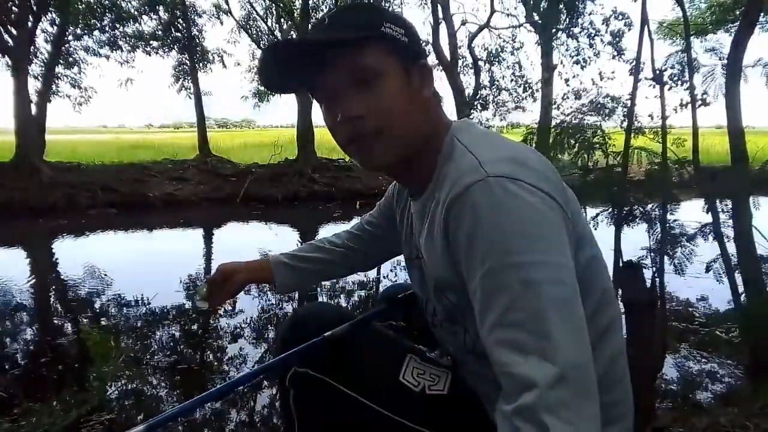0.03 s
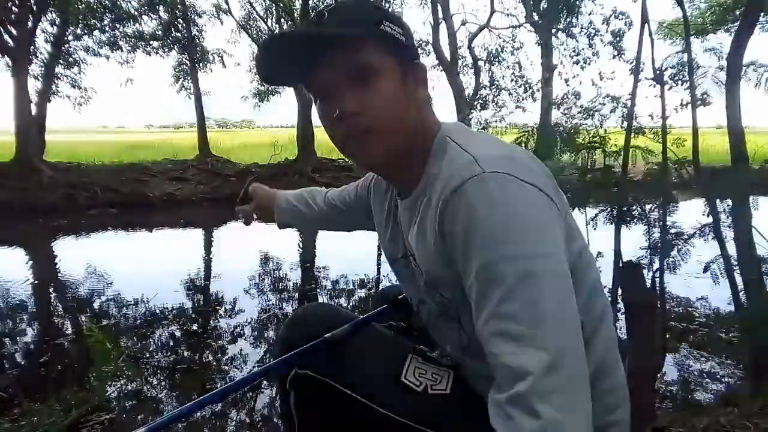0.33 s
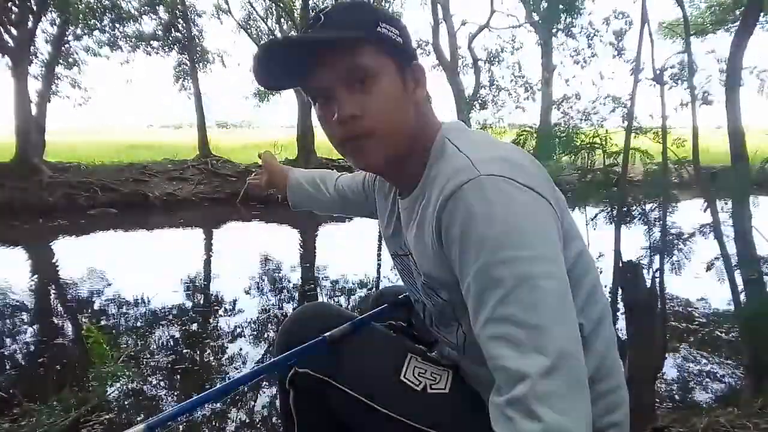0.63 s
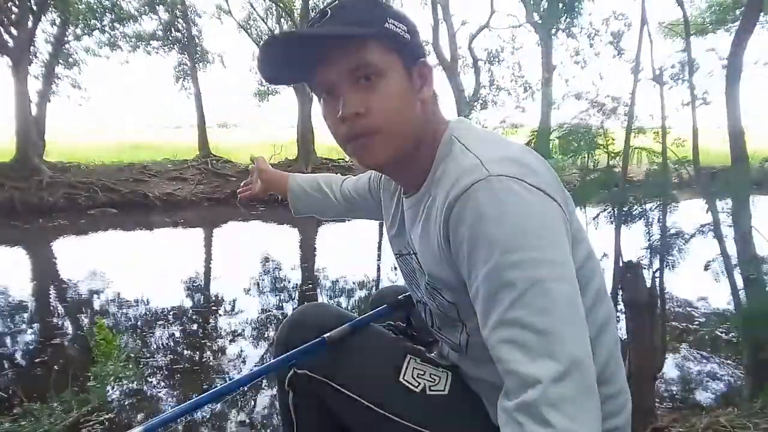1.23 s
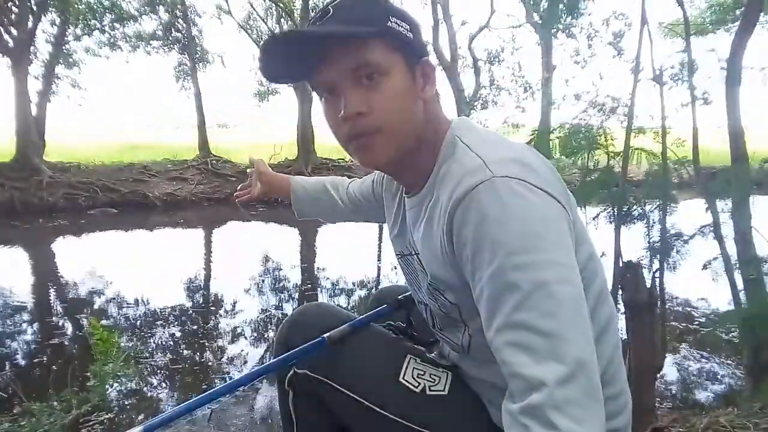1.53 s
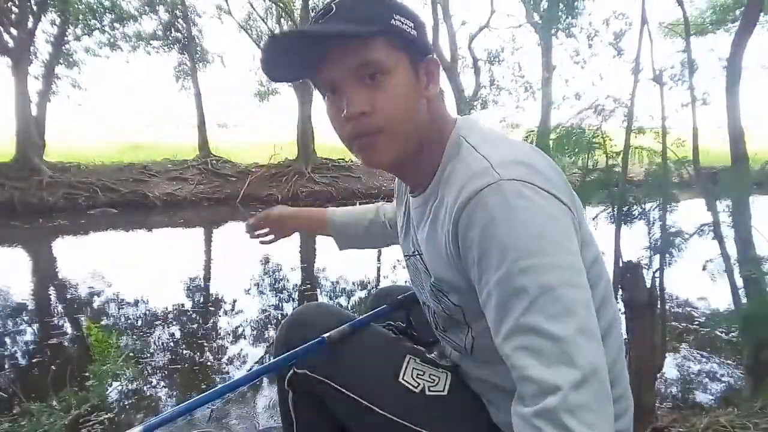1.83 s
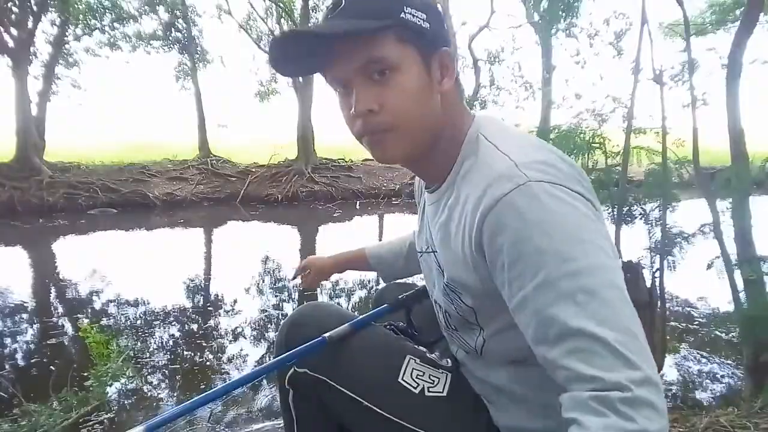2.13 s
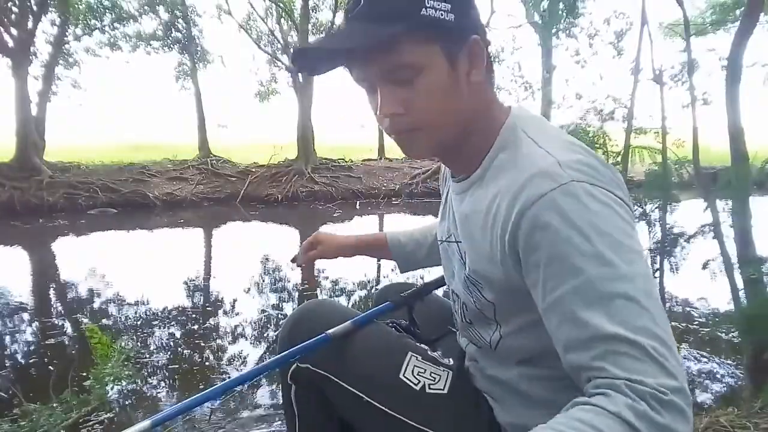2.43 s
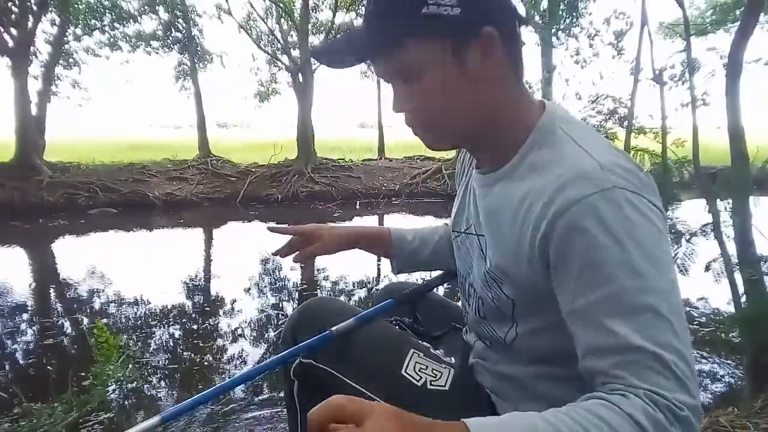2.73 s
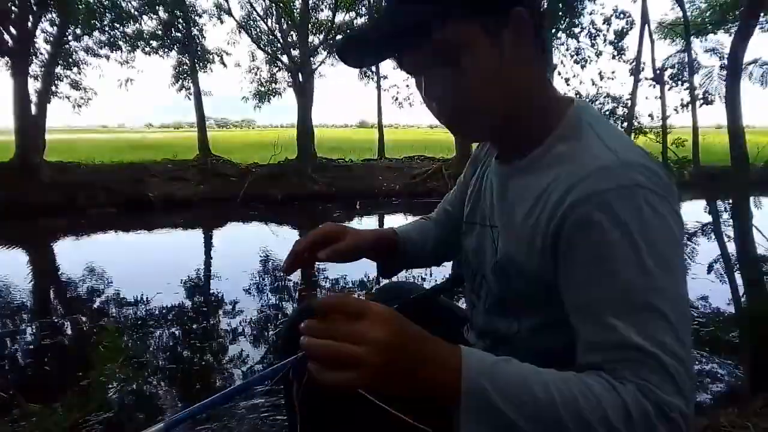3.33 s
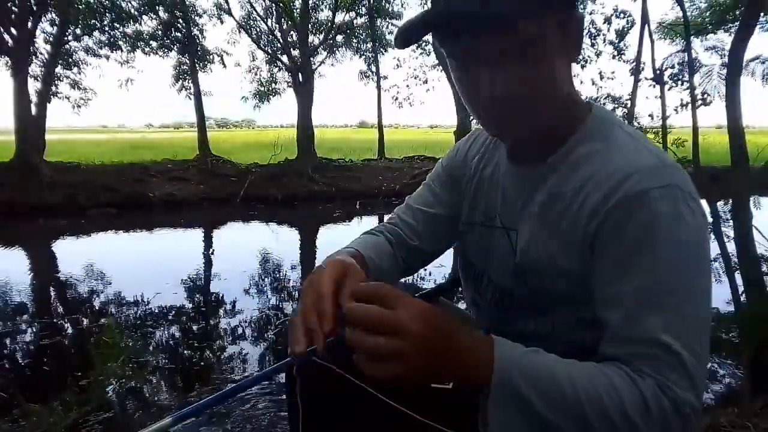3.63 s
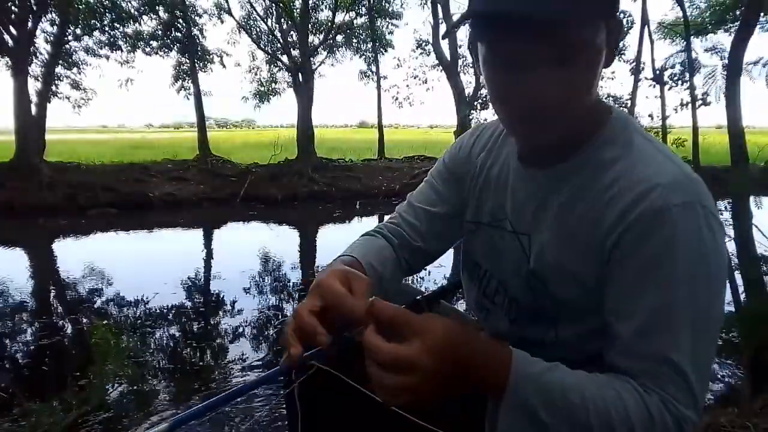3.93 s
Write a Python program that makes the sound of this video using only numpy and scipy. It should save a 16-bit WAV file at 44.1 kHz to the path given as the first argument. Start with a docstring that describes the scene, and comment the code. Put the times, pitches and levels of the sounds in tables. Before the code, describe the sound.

A small thing splashes into a still channel with a sharp slap, bubbles and pattering spray. Birds chirp in the trees over faint insects and thin ticks, while a hand bumps and rubs the microphone throughout.

```python
"""Beside a still channel under trees, with the microphone on a hand-held camera.
A small thing is tossed into the water: a sharp slap, ringing bubbles, then spray pattering back.
Birds chirp, whistle and slur from the trees, the farther ones mostly echo, and a small creature's
thin high ticks stand over a steady band of insects and distant air.
Right at the microphone, the hand bumps and rubs the case, and a sleeve rustles."""
import sys
import numpy as np
from scipy import signal
from scipy.fft import rfft, irfft
from scipy.io import wavfile

SR = 44100
rng = np.random.default_rng(int(sys.argv[2]) if len(sys.argv) > 2 else 0)


def unload_wav(signal):
    """Save mono or channel-first audio to the path in sys.argv[1] as 16-bit WAV at rate SR, clipped to [-1, 1]."""
    wavfile.write(
        sys.argv[1],
        SR,
        np.round(np.clip(np.atleast_2d(signal).T, -1, 1) * 32767).astype(np.int16),
    )


N = 176400
T = np.arange(N) / SR

# spectrum of water pattering on water (frequency [Hz], relative density [dB])
PATTER_SPECTRUM = [(200, -11), (600, -3), (1200, -8.5), (2100, 4), (3000, -7.5), (4500, -2), (7000, -2),
                   (9000, -8), (11500, -7.5), (16000, -18)]
DROP_CYCLES, SPRAY_SPREAD_DB = 6.5, 3  # cycles for a drop's ring to fall to 1/e; spread of drop levels


def amp(db):
    return 10 ** (np.asarray(db) / 20)


def unit(x):
    return x / np.sqrt(np.mean(x ** 2) + 1e-20)


def add(mix, s, sound):
    part = mix[max(round(s * SR), 0):][:len(sound)]
    part += sound[:len(part)]


def level(points):
    """Gain along a curve of (time [s], level [dB])."""
    return amp(np.interp(T, *np.transpose(points)))


def colour(x, points):
    """Filters by a spectrum of (frequency [Hz], level [dB]); rms 1."""
    f, db = np.transpose(points)
    hz = np.fft.rfftfreq(len(x), 1 / SR)
    gain = amp(np.interp(np.log(hz + 1), np.log(f), db))
    return unit(irfft(rfft(x) * gain, len(x)))


def wander(hz, size=N):
    """Smooth random motion up to a rate; rms 1."""
    f = np.fft.rfftfreq(size, 1 / SR)
    return unit(irfft(rfft(rng.standard_normal(N)[:size]) / (1 + (f / hz) ** 4), size))


def grains(per_s, spread_db):
    """Random clicks of uneven size; rms 1."""
    sizes = rng.standard_normal(N) * amp(spread_db * np.minimum(rng.exponential(1, N), 4))
    return unit(sizes * (rng.random(N) < per_s / SR))


def tone(hz):
    """A sine that follows a pitch curve."""
    return np.sin(2 * np.pi * np.cumsum(hz) / SR)


def trees(x, t60_s=0.38, build_s=0.0011):
    """Diffuse echo from trunks, leaves and banks."""
    t = T[:SR // 2]
    tail = rng.standard_normal(len(t)) * 1000 ** (-t / t60_s) * (1 - np.exp(-t / build_s))
    return signal.fftconvolve(x, tail / np.linalg.norm(tail))[:N]


def insects(centre_hz=7545, width_hz=270, db=-76, flutter_db=2):
    """Insects merge into one steady, narrow band that flutters slightly."""
    hz = np.fft.rfftfreq(N, 1 / SR)
    band = 1 / (1 + ((hz - centre_hz) / width_hz) ** 2 / 2) ** 1.36
    hiss = unit(irfft(rfft(rng.standard_normal(N)) * band, N))
    return hiss * amp(db + flutter_db * wander(hz=39.5))


def air(db=-70.5):
    """Distant air: a faint, even wash, strongest in the bass."""
    # spectrum of the open air (frequency [Hz], relative density [dB])
    spectrum = [(20, 18.5), (100, 16.5), (250, 10.5), (420, 4.5), (714, 3), (1200, 1.5), (3100, -2),
                (3700, -0.5), (4600, -3.5), (6700, -1.5), (9300, -7), (15000, -9)]
    return amp(db) * colour(rng.standard_normal(N), spectrum)


def handling(push_db=-0.5, push_cycles=0.21, shudder_db=-9, shudder_s=0.015, lumps_db=6):
    """At the microphone, each bump pushes the case and sets it shuddering; the grip rubs in between."""
    # bumps of the hand (time [s], level [dB], sharpness [Hz])
    bumps = [(.042, -16, 118), (0.282, -28.5, 115), (0.511, -29, 127), (.599, -22.5, 121),
             (.621, -24.5, 121), (.654, -21, 107), (.803, -28, 81), (0.842, -26, 101), (1.278, -26, 154),
             (1.308, -24, 117), (1.42, -28.5, 132), (1.435, -22, 273), (1.438, -15, 135), (1.448, -19, 192),
             (1.641, -26.5, 109), (1.659, -24, 151), (2.05, -22.5, 114), (2.182, -25, 93),
             (2.214, -22, 131), (2.373, -27, 111), (2.435, -27.5, 89.5), (2.466, -26.5, 130),
             (2.707, -24, 90), (2.925, -23.5, 114), (2.964, -27.5, 117), (3.019, -22.5, 115),
             (3.052, -26, 140), (3.098, -22.5, 122), (3.139, -19, 125), (3.202, -25, 130),
             (3.313, -23.5, 113), (3.389, -19.5, 140), (3.504, -28.5, 145), (3.626, -29.5, 111),
             (3.667, -26.5, 146), (3.869, -27, 106), (3.945, -27, 96)]
    # rubbing of the hand (time [s], level [dB])
    grip = [(0, -33), (.12, -50), (.4, -51), (.55, -39.5), (.85, -40.5), (.92, -55), (1.05, -32),
            (1.22, -72), (1.3, -38.5), (1.46, -30), (1.56, -42.5), (1.98, -48.5), (2.22, -33.5),
            (2.32, -47.5), (2.48, -33.5), (2.75, -56.5), (3.05, -30.5), (3.27, -41.5), (3.42, -35.5),
            (3.56, -41.5), (4, -43.5)]
    # rumble of the case (frequency [Hz], relative density [dB])
    case_spectrum = [(15, -28.5), (30, -15), (60, 4.5), (110, 2.5), (160, -8), (250, -25.5), (350, -32),
                     (500, -44.5), (900, -65), (2000, -93)]
    pushes, shudder_power = np.zeros(N), np.zeros(N)
    for s, db, hz in bumps:
        spread = ((T - s) * hz / push_cycles) ** 2 / 2
        pushes -= amp(db + push_db) * np.exp(-np.minimum(spread, 50)) * (1 - spread)
        shudder_power += amp(db + shudder_db) ** 2 * np.exp(-np.minimum(2 * abs(T - s) / shudder_s, 50))
    pushes = signal.sosfilt(signal.butter(2, 49.6, "high", fs=SR, output="sos"), pushes)
    rub = level(grip) * unit(amp(lumps_db * wander(hz=18.4)))
    return pushes + np.sqrt(shudder_power + rub ** 2) * colour(rng.standard_normal(N), case_spectrum)


def raspy_call(pitch, swell, db, rasp, under=0, under_ratio=0.72):
    """A bird's voice, rough with pitch jitter, as (direct, to the trees); fainter calls are farther off."""
    hz = pitch * (1 + rasp * wander(hz=750, size=len(pitch)))
    call = amp(db) * swell * (tone(hz) + under * tone(under_ratio * hz))
    direct_share = np.clip(0.37 * amp(db + 53), 0, 1)  # 37 % of the power for a call at -53 dB
    return np.sqrt(direct_share) * call, np.sqrt(1 - direct_share) * call


def chirps(break_at=0.52, break_width=0.087, step_share=0.444, dip=0.29, under_db=-8.5):
    """A bird sags on a high note, breaks, and sags on a low one; a second voice sounds below the first."""
    # falling chirps (time [s], length [s], level [dB], start [Hz], end [Hz], rasp [share of pitch])
    calls = [(0.014, 0.063, -61.5, 4580, 3020, 0.094), (0.292, 0.051, -54, 5260, 3550, 0.044),
             (0.844, .06, -64, 4580, 3550, 0.096), (1.07, 0.06, -52.5, 5240, 3210, 0.08),
             (1.645, 0.072, -62, 4390, 3020, 0.083), (1.973, 0.061, -50, 5320, 3550, 0.043),
             (2.718, 0.058, -52, 5325, 3480, 0.05), (3.252, 0.073, -60, 4500, 3000, 0.14),
             (3.356, 0.029, -57.5, 5630, 3470, 0.1), (3.656, 0.059, -51.5, 5360, 3400, 0.05)]
    near, far = np.zeros(N), np.zeros(N)
    for s, length, db, high, low, rasp in calls:
        u = np.arange(0, 1, 1 / (length * SR))
        step = (1 + np.tanh((u - break_at) / break_width)) / 2
        pitch = high + (low - high) * (step_share * step + (1 - step_share) * u)
        swell = np.sin(np.pi * u) ** 0.55 * (1 - dip * np.sin(np.pi * step))
        direct, scattered = raspy_call(pitch, swell, db, rasp, under=amp(under_db) * (1 - step))
        add(near, s, direct)
        add(far, s, scattered)
    return near + trees(far)


def sleeve():
    """Cloth brushes close to the microphone in short swells of fine grains."""
    # swells of rustling (time [s], rise [s], fall [s], level [dB])
    rustles = [(.09, .04, 0.032, -72.5), (2.461, 0.032, 0.14, -67.5), (2.78, 0.044, 0.027, -71),
               (2.91, 0.0066, 0.049, -64), (3.128, 0.013, 0.033, -74), (3.802, 0.0049, 0.074, -61.5)]
    # spectrum of the cloth (frequency [Hz], relative density [dB])
    cloth = [(300, -14), (1500, -14.5), (4000, -3.5), (7000, -1), (11000, -5.5), (16000, -12)]
    swell = sum(amp(db) * np.exp(-np.maximum((s - T) / rise, (T - s) / fall))
                for s, rise, fall, db in rustles)
    return swell * colour(grains(per_s=6900, spread_db=1.0), cloth)


def ticks(length_s=0.0044, sag=0.33, echo=0.48):
    """A small creature's ticks: the pitch whips up and down within a few milliseconds."""
    # thin ticks (time [s], peak [dB], top pitch [Hz])
    calls = [(0.1193, -55, 7530), (0.547, -56, 7900), (1.6185, -42, 7790), (1.7515, -55.5, 7580),
             (1.9945, -52.5, 7820), (2.1266, -48, 7650), (2.578, -49.5, 7670), (2.647, -52.5, 7500),
             (2.7213, -47, 7950), (2.7847, -51, 7400), (2.9878, -47, 7810), (3.124, -45.5, 7860),
             (3.428, -44, 7840), (3.5684, -41.5, 7780), (3.96, -49.5, 7450), (3.988, -44, 7830)]
    out, u = np.zeros(N), np.arange(0, 1, 1 / (length_s * SR))
    arch = 1 - sag * abs(2 * u - 1) ** 2.98
    swell = np.sin(np.pi * u) ** 0.69
    for s, db, top in calls:
        add(out, s, amp(db) * swell * tone(top * arch))
    return out + echo * trees(out)


def whistles(arch=0.0185, waver=0.0078, echo=0.8):
    """A bird in the trees whistles soft, clear notes, slightly arched in pitch."""
    # whistled notes (time [s], length [s], level [dB], start [Hz], end [Hz])
    calls = [(1.007, 0.083, -64.5, 3560, 3960), (2.025, .105, -64.5, 2840, 2906),
             (3.194, 0.121, -60, 3140, 3227), (3.44, .14, -62, 3165, 3040)]
    out = np.zeros(N)
    for s, length, db, first, last in calls:
        u = np.arange(0, 1, 1 / (length * SR))
        glide = first + (last - first) * u
        bend = 1 + arch * np.sin(np.pi * u) + waver * wander(hz=150, size=len(u))
        add(out, s, amp(db) * np.sin(np.pi * u) ** 2 * tone(glide * bend))
    return out + echo * trees(out)


def slap(at_s=1.0678, db=-24.5, decay_s=0.00062):
    """The tossed thing hits the surface with one very short crack."""
    # spectrum of the impact (frequency [Hz], relative density [dB])
    spectrum = [(150, -7), (450, -0.5), (950, -1), (1350, -37), (1900, -5.5), (3500, -13), (5200, -10),
                (7600, -1.5), (9100, -9), (10900, -2.5), (16000, -22)]
    out, t = np.zeros(N), T[:SR // 8]
    lead = 100  # samples of room for the filter to ring ahead of the hit
    burst = rng.standard_normal(len(t)) * np.roll(np.exp(-t / decay_s), lead)
    crack = colour(burst, spectrum) * np.sqrt(decay_s / 2 / t[-1])  # energy of a decay that starts at 1
    add(out, at_s - lead / SR, amp(db) * crack)
    return out


def bubbles(rise_per_s=0.9, wobble=0.052, attack_s=0.00082):
    """Rising bubbles ring briefly, their pitch wobbling and creeping upward."""
    # ringing bubbles (time [s], level [dB], pitch [Hz], time to fall 60 dB [s])
    rings = [(1.068, -47.5, 478, .04), (1.068, -56, 920, .04), (1.067, -53, 1800, 0.021),
             (1.088, -53, 880, 0.042), (1.132, -46, 564, 0.043), (1.187, -45.5, 675, 0.064),
             (1.187, -48, 1560, 0.021), (1.3, -60.5, 2190, 0.12), (1.328, -56.5, 1440, 0.036),
             (1.36, -62.5, 953, 0.081), (1.506, -43.5, 664, 0.026), (1.512, -54.5, 1890, 0.074),
             (1.586, -44.5, 1817, 0.035), (1.615, -60.5, 777, 0.097)]
    out, t = np.zeros(N), T[:SR // 8]
    for s, db, hz, t60 in rings:
        pitch = hz * (1 + rise_per_s * t + wobble * wander(hz=201, size=len(t)))
        envelope = amp(db - 60 * t / t60) * (1 - np.exp(-t / attack_s))
        add(out, s, envelope * tone(pitch))
    return out


def drops(splat_gain=0.44, splat_s=0.0015):
    """Larger drops fall back, each with a ping and a noisy splat."""
    # drops landing (time [s], level [dB], pitch [Hz])
    landings = [(1.0707, -44, 6000), (1.088, -50, 9000), (1.139, -41, 3920), (1.142, -39.5, 10600),
                (1.156, -50, 9800), (1.1872, -41, 6900), (1.201, -50, 6450), (1.211, -47, 7000),
                (1.222, -48, 6300), (1.239, -50, 10500), (1.3003, -43.5, 4050), (1.311, -46.5, 8000),
                (1.3238, -43.5, 6260), (1.339, -50.5, 4600), (1.3565, -49.5, 7120), (1.3957, -46.5, 7050),
                (1.4855, -50.5, 5020), (1.5062, -51, 3800), (1.525, -52, 5000), (1.567, -47, 4100),
                (1.5704, -38, 5530)]
    out, t = np.zeros(N), T[:SR // 8]
    for s, db, hz in landings:
        ping = np.exp(-t * hz / DROP_CYCLES) * np.sin(2 * np.pi * hz * t)
        splat = splat_gain * np.exp(-t / splat_s) * colour(rng.standard_normal(len(t)), PATTER_SPECTRUM)
        add(out, s, amp(db) * (1 - np.exp(-t * hz)) * (ping + splat))
    return out


def spray(pings_per_s=600, ping_hz=(2980, 13100), ping_gain=0.88, mist_gain=0.5):
    """Fine spray lands as clicks, a misty hiss and tiny drops that each ring for a few cycles."""
    # swell of the spray (time [s], level [dB])
    shower = [(1.066, -100), (1.07, -59), (1.1, -63), (1.14, -61), (1.17, -62.5), (1.2, -62.5), (1.27, -67),
              (1.32, -66.5), (1.4, -71), (1.465, -77.5), (1.515, -60.5), (1.55, -67), (1.61, -69),
              (1.68, -81), (1.8, -100)]
    clicks = grains(per_s=1200, spread_db=SPRAY_SPREAD_DB)
    mist = mist_gain * rng.standard_normal(N)
    pings, t = np.zeros(N), T[:400]
    pitches = np.geomspace(*ping_hz, num=24)
    for hz in pitches:
        sizes = amp(SPRAY_SPREAD_DB * np.minimum(rng.exponential(1, N), 3))
        hits = sizes * (rng.random(N) < pings_per_s / len(pitches) / SR)
        ring = np.exp(-t * hz / DROP_CYCLES) * (1 - np.exp(-t * hz)) * np.sin(2 * np.pi * hz * t)
        pings += signal.oaconvolve(hits, ring)[:N]
    return level(shower) * colour(clicks + mist + ping_gain * unit(pings), PATTER_SPECTRUM)


def slurs(bend=1.7, rasp=0.055):
    """A lower bird call starts on a level pitch and swells as it slides down."""
    # slurred calls (time [s], length [s], level [dB], start [Hz], end [Hz])
    calls = [(1.734, 0.07, -69, 2687, 2090), (2.112, 0.08, -52, 2860, 1929), (2.475, .088, -48, 2830, 1945)]
    near, far = np.zeros(N), np.zeros(N)
    for s, length, db, high, low in calls:
        u = np.arange(0, 1, 1 / (length * SR))
        pitch = high + (low - high) * u ** bend
        swell = np.sin(np.pi * u ** 1.51) ** 0.7
        direct, scattered = raspy_call(pitch, swell, db, rasp)
        add(near, s, direct)
        add(far, s, scattered)
    return near + trees(far)


def scene():
    """The hand close up, the splash with a light echo, and the wildlife beyond, in mono."""
    hand = handling()
    splash = slap() + bubbles() + drops()
    water = splash + spray() + 0.26 * trees(splash)
    birds = chirps() + whistles() + slurs()
    return (hand + water + birds + ticks() + sleeve() + insects() + air())[None]


def record(dry, edge_hz=15700):
    """The recorder's band limit cuts the highest treble."""
    lowpass = signal.firwin(511, edge_hz, window=("kaiser", 9), fs=SR)
    return signal.oaconvolve(dry, lowpass[None], "same")


dry = scene()
out = record(dry)
unload_wav(out)
```